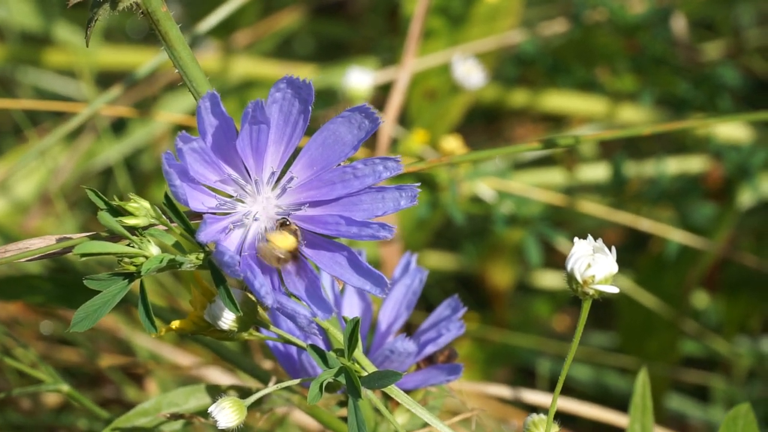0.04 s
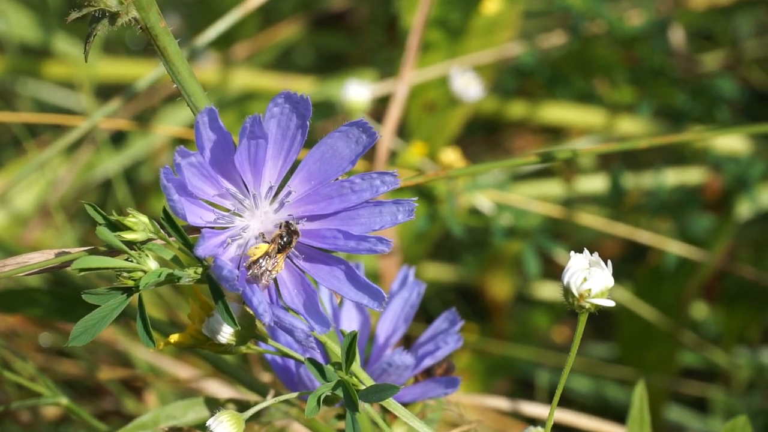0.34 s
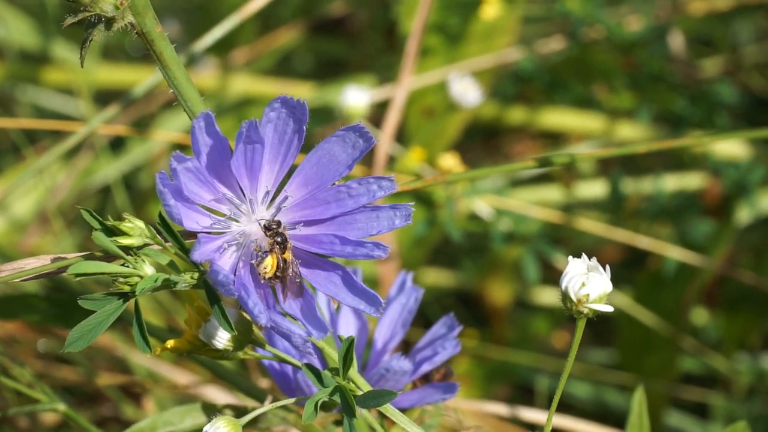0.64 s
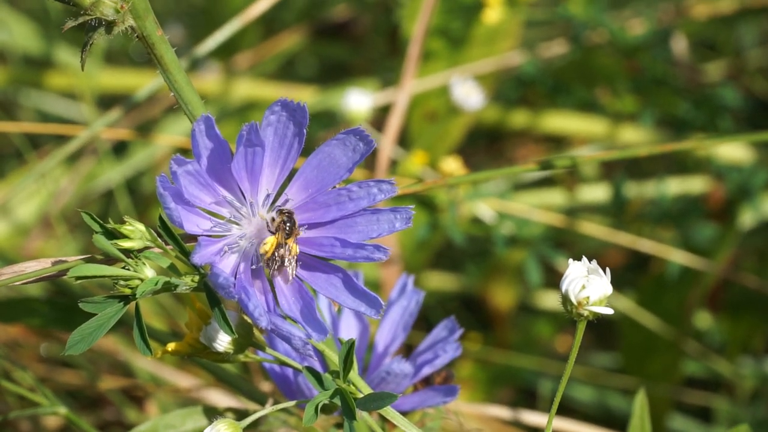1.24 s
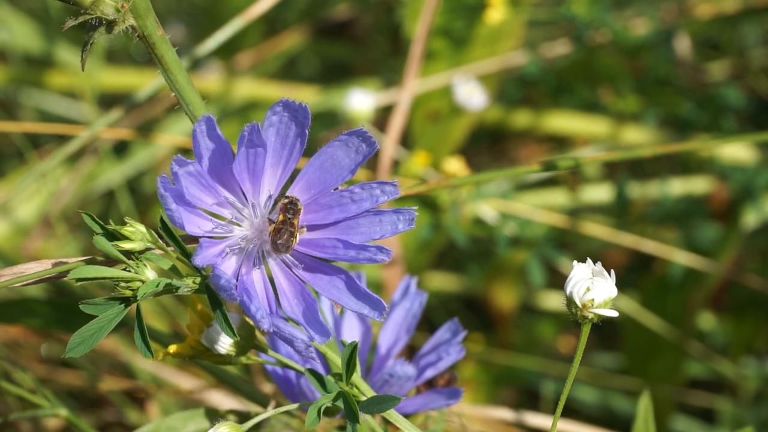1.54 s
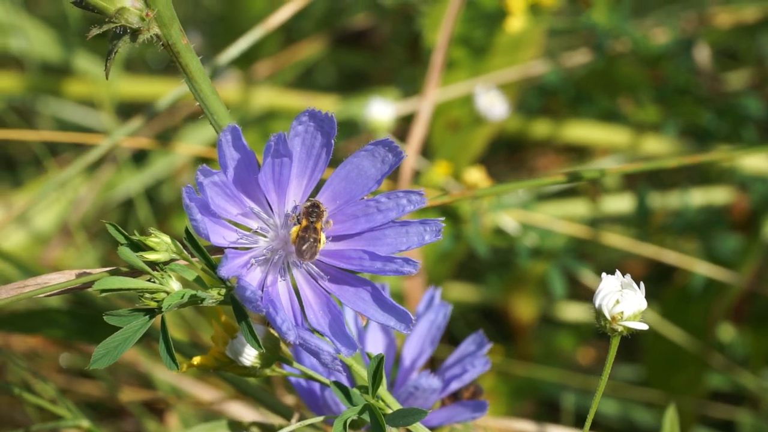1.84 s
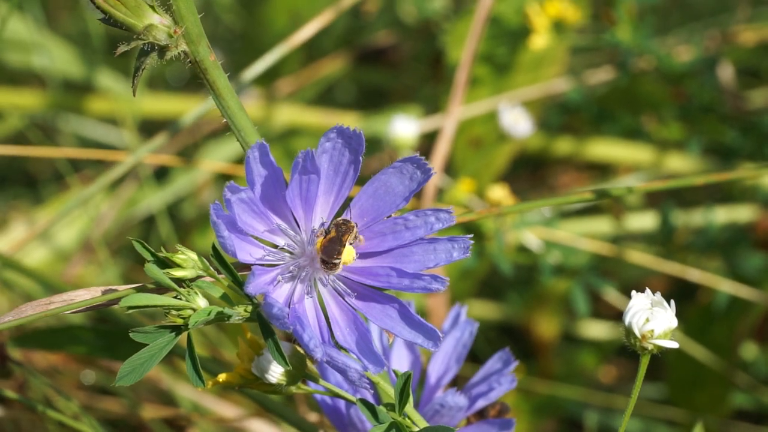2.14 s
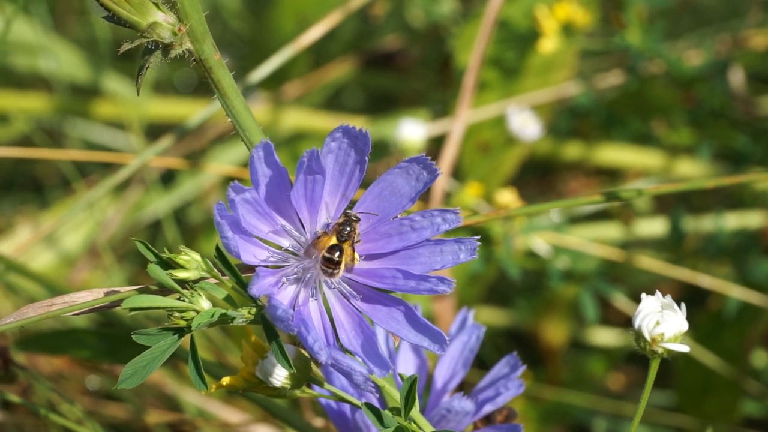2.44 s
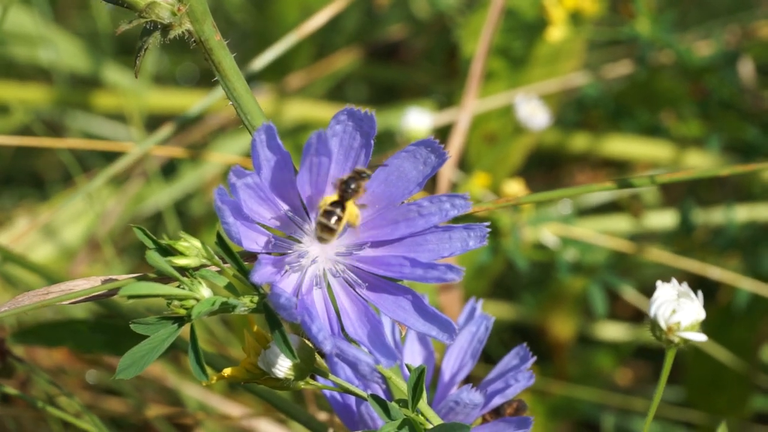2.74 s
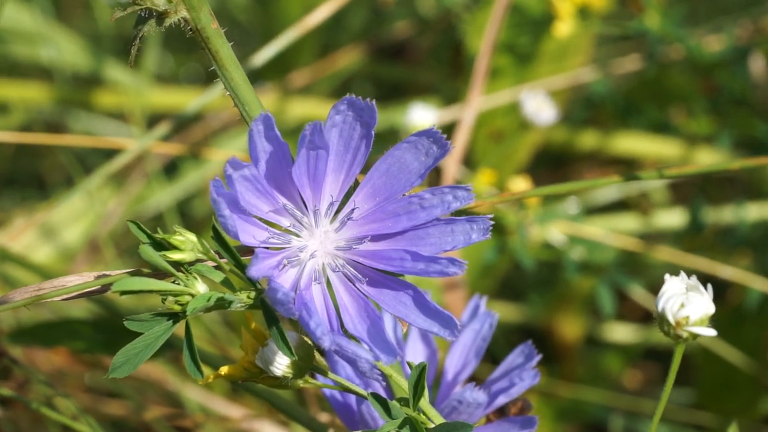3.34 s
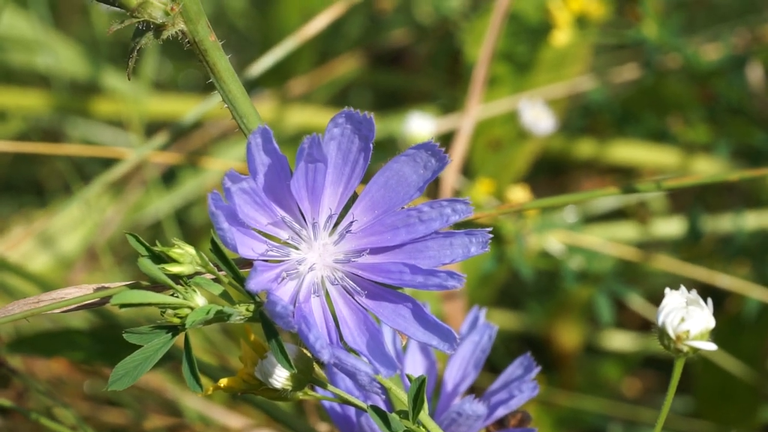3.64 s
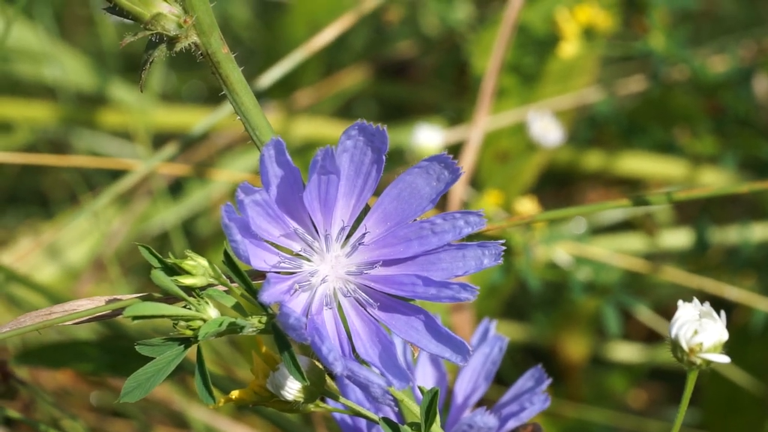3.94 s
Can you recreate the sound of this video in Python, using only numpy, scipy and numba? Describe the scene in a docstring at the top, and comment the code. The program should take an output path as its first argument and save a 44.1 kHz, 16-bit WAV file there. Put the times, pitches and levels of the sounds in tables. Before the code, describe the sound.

Several grasshoppers chirping shrilly in a meadow, with a small bee faintly buzzing past.

```python
"""A sunny meadow: three grasshoppers sing in trains of rasping strokes, others in short chirps and
scratches, over a distant chorus. They sing by stridulation: a toothed file drawn over a vein drives
the wing's resonance, which rises in pitch through each stroke, and its octave. Near the end a small
bee flies past, buzzing at the harmonics of its wing beat. Stems tick, grass rustles and faint wind
rumbles underneath."""
import sys
import numpy as np
from scipy import signal
from scipy.fft import rfft, irfft
from scipy.io import wavfile
from scipy.ndimage import uniform_filter1d
from numba import njit

SR = 44100
rng = np.random.default_rng(int(sys.argv[2]) if len(sys.argv) > 2 else 0)


def int16_out(signal):
    """Quantize to a 16-bit WAV file."""
    q = np.round(np.clip(np.atleast_2d(signal).T, -1, 1) * 32767)
    wavfile.write(sys.argv[1], SR, q.astype(np.int16))


N = 176400

# Pace. Each row: time in seconds, strokes made so far. The slow singer has one table per verse.
FAST_PACE, FAR_PACE, SLOW_VERSES = [(.583, 0), (.690, 3), (.871, 8), (1.253, 18), (1.646, 28), (2.059, 38),
                                    (2.484, 48), (2.712, 53)], [(.008, 0), (.49, 9), (3.295, 60), (3.742, 68),
                                                       (3.967, 72)], [
    [(.670, 0), (.966, 6), (1.341, 13), (1.718, 20), (1.943, 24), (2.305, 30)],
    [(2.708, 0), (2.857, 3), (3.333, 12), (3.994, 24)],
]
# Effort. Each row: time in seconds, source level in dB, mid-stroke pitch in Hz, left minus right in dB.
FAST_EFFORT, SLOW_EFFORT, FAR_EFFORT = [(.58, -30, 6250, 3), (.7, -27.5, 6450, -3), (.85, -25, 7300, -1),
                                        (1.1, -24.5, 7500, -1), (1.6, -24.5, 7600, -2),
                                        (2.2, -25, 7550, -4), (2.6, -25.5, 7150, -4),
                                        (2.72, -27.5, 7100, -3)], [(.67, -30.5, 7900, 0), (1., -27.5, 7900, 1),
                                                             (2.3, -27.5, 7900, 1), (2.7, -29, 8000, 2),
                                                             (2.92, -25.5, 8000, 2), (3.3, -27, 8050, 3),
                                                             (4, -28, 8100, 4)], [(0, -29, 7750, 0),
                                                                                  (.55, -29.5, 7750, 0),
                                                                                  (.9, -34, 7900, 0),
                                                                                  (2.3, -32, 8000, 1),
                                                                                  (3.3, -29, 8100, 1),
                                                                                  (4, -29, 8200, 2)]
# Stroke shapes. Each row: half-length in seconds, pitch rise in Hz per second, bandwidth in Hz,
# octave in dB, rasp in dB, delay of the peak in seconds. The slow singer has one row per verse.
FAST_STROKE, FAR_STROKE, SLOW_STROKES = (.022, 190000, 700, -5, -6, .005), (.022, 80000, 700, -14, -12, 0), [(.021, 60000, 900, 3, -6, .001),
                                                                                  (.023, 70000, 950, -7, -6, -.002)]
# Radiation efficiency of the wings. Each row: frequency in Hz, gain in dB.
FAST_WING, SLOW_WING = [(1500, -80), (4000, -57), (5400, -37), (6100, -21), (6700, -5), (7600, -2),
                        (8500, 1), (9500, -3), (10500, -7), (12500, -6), (13300, -4), (13800, 1.5),
                        (14400, -2), (16000, -3)], [(1500, -80), (4000, -57), (5600, -35), (6800, -10), (7700, -2),
                                           (8400, -1), (10000, -4), (11500, -2), (13000, -3), (14500, -1),
                                           (15600, 4.5)]

def singers(t):
    """Three stroke trains superpose: the fast one tires, the slow one rests once, the far one goes on."""
    fast = stroke_train(t, FAST_PACE, FAST_EFFORT, FAST_STROKE, FAST_WING)
    slow = sum(stroke_train(t, verse, SLOW_EFFORT, shape, SLOW_WING)
               for verse, shape in zip(SLOW_VERSES, SLOW_STROKES))
    far = stroke_train(t, FAR_PACE, FAR_EFFORT, FAR_STROKE, SLOW_WING)
    return fast + slow + far


def stroke_train(t, pace, effort, shape, radiation):
    """Quasi-periodic excitation: strokes recur at the given pace, each a little different in strength."""
    when, count = np.array(pace).T
    times = np.interp(np.arange(count[-1] + 1), count, when)
    db = curve(effort, times) + rng.standard_normal(len(times))
    strokes = np.c_[times, db, curve(effort, times, column=2), curve(effort, times, column=3)]
    return stridulate(t, strokes, shape, radiation)


# Spectrum of the rasp. Each row: frequency in Hz, relative gain in dB.
RASP = [(4000, -47), (5500, -21), (7000, -53), (8500, 29.5), (10500, 10), (12000, 30), (14000, 37),
        (16000, -40)]

def stridulate(t, strokes, shape, radiation):
    """Forced resonance: each stroke swells and fades as tooth clicks ring the wing at a rising pitch."""
    half_length, rise, width_hz, octave_db, rasp_db, delay = shape
    rows = np.array(strokes, float)
    nearest = np.searchsorted((rows[1:, 0] + rows[:-1, 0]) / 2 + delay, t)
    when, db, pitch, pan_db = rows[nearest].T
    from_peak = np.clip(t - when - delay, -half_length, half_length)
    hz = np.maximum(pitch + rise * np.clip(from_peak, -half_length / 2, half_length / 2), 4000)
    clicks = tooth_clicks()
    ring = lambda f, width: unit(resonate(resonate(clicks, f, width), f, 2 * width))
    octave = undb(octave_db) * ring(2 * hz, 2 * width_hz)
    rasp = undb(rasp_db) * unit(colour(clicks, RASP))
    wing = unit(ring(hz, width_hz) + octave + rasp)
    swell = np.cos(np.pi / 2 * from_peak / half_length) ** 4
    heard = through_grass(wing * swell * undb(db), pan_db, bearing=np.sign(np.mean(pan_db)))
    return colour(heard, radiation)


def tooth_clicks(teeth_per_s=2200, scatter_db=3):
    """Impulse excitation: the teeth of a file strike a wing vein, uneven in spacing and strength."""
    teeth_passed = np.cumsum(teeth_per_s * np.exp(.35 * walk(1500))) / SR
    impulses = np.diff(np.floor(teeth_passed), prepend=0)
    return unit(impulses * undb(scatter_db * rng.standard_normal(N)))


def through_grass(x, pan_db, bearing, tail_db=-1, decay_s=.0055, ear_lag_s=.000207):
    """Stems scatter a short tail; interaural level and delay give direction (bearing 1 left, -1 right)."""
    t = np.arange(N // 40) / SR
    tail = rng.standard_normal((2, len(t))) * np.exp(-t / decay_s)
    tail /= np.sqrt(np.sum(tail ** 2, axis=1, keepdims=True))
    hz = np.fft.rfftfreq(N, 1 / SR)
    right = irfft(rfft(x) * np.exp(-2j * np.pi * hz * bearing * ear_lag_s), N)
    scattered = undb(tail_db) * signal.fftconvolve(x[None], tail)[:, :N]
    return (np.array([x, right]) + scattered) * undb(np.array([pan_db, -pan_db]) / 2)


# Syllables. Each row: time in seconds, source level in dB, pitch in Hz, left minus right in dB.
CHIRPS, SCRATCHES = [(.36, -39, 6800, 1), (.58, -32.5, 6460, -5), (.622, -31, 6560, -3),
                     (.654, -34.5, 6100, -3), (1.021, -28.5, 6650, -4), (1.061, -26.5, 6500, -8),
                     (1.847, -32, 7000, 1), (1.887, -27, 6750, 1), (1.927, -26.5, 6750, 0),
                     (3.129, -33, 7360, -6), (3.172, -28, 6940, -6), (3.212, -25, 7100, -5)], [(.363, -34, 6660, 7), (.84, -28, 6800, 5), (0.883, -23, 7100, 4),
                                     (1.895, -27.5, 6900, -9), (1.943, -29.5, 6800, -13),
                                     (2.93, -33, 6700, 1), (2.966, -24.5, 7100, 2),
                                     (3.001, -22.5, 7230, 1.5), (3.035, -37, 7100, 2),
                                     (3.62, -32, 7300, -1), (3.66, -28, 7100, 3), (3.695, -24.5, 7300, 2)]
# Stroke shapes, with the same columns as the singers' shapes.
CHIRP_STROKE, SCRATCH_STROKE = (.042, 35000, 1900, -12, -3, .003), (.027, 30000, 2000, 9, 6, .001)
# Radiation efficiency of the wings. Each row: frequency in Hz, gain in dB.
CHIRP_WING, SCRATCH_WING = [(1500, -70), (3500, -46), (4700, -24), (5600, -17), (6500, -6), (7500, -1),
                            (12000, -1), (16000, -3)], [(4000, -60), (6000, -28), (8000, -10), (11500, -7),
                                               (13000, 0), (16000, 2)]

def short_calls(t):
    """Heavily damped resonance: lower chirps, and close scratches bright with octave and rasp."""
    chirps = stridulate(t, CHIRPS, CHIRP_STROKE, CHIRP_WING)
    return chirps + stridulate(t, SCRATCHES, SCRATCH_STROKE, SCRATCH_WING)


# Spectrum of the chorus. Each row: frequency in Hz, relative gain in dB.
CHORUS = [(4000, -46), (5000, -35), (6000, -21.5), (6700, -7), (7300, -1), (7700, 1), (8500, -3.5),
          (9300, -3), (10500, -2.5), (12000, -3), (13300, 1), (14300, 3.7), (15700, 3.5)]

def chorus(count=6, level_db=-25, throb_db=3.4):
    """Incoherent summation: far singers, each sweeping upward at its own rate, blur into a sizzle."""
    out = 0
    for k in range(count):
        strokes_per_s = (17 + 1.3 * k) * (1 + .0501 * walk(3.04))
        cycle = (rng.random() + np.cumsum(strokes_per_s) / SR) % 1
        clicks = tooth_clicks()
        wing = unit(resonate(clicks, 7000 + 2000 * cycle, width_hz=1040))
        voice = (clicks + undb(-4.5) * wing) * undb(-throb_db * np.cos(2 * np.pi * cycle))
        bearing = np.cos(np.pi * k / (count - 1))
        out += through_grass(voice, np.full(N, 2 * bearing), bearing)
    return unit(colour(out, CHORUS)) * undb(level_db + .4 * walk(3))


# Wing beat. Each row: time in seconds, beats per second.
BEE_PITCH = [(2.7, 150), (2.78, 128), (2.84, 140), (2.94, 123), (3.04, 142), (3.13, 138), (3.23, 104),
             (3.32, 144), (3.43, 129), (3.5, 142), (3.57, 136), (3.63, 122), (3.7, 107), (3.78, 144),
             (3.92, 108), (4, 140)]
# Fly-past. Each row: time in seconds, level in dB.
BEE_LEVEL = [(2.6, -75), (3.05, -70), (3.22, -65), (3.32, -57.5), (3.39, -56), (3.48, -49.5), (3.54, -47.5),
             (3.61, -47.5), (3.7, -61), (3.8, -63.5), (4, -72)]
# Buzz. Each row: harmonic number, relative level in dB when far, the same when closest.
BEE_HARMONICS = [(1, -12, 3), (2, 0, 0), (3, -19, -6), (4, -24, -22), (5, -15, -15), (6, -17, -15),
                 (7, -25, -27)]

def bee(t, closest_s=3.53, pass_s=.06, swish_db=-3):
    """Periodic wing beats radiate a harmonic series and a swish; low odd harmonics grow up close."""
    phase = 2 * np.pi * np.cumsum(curve(BEE_PITCH, t) * (1 + .017 * walk(110))) / SR
    fade_in = np.clip((t - BEE_LEVEL[0][0]) * 10, 0, 1)
    closeness = np.exp(-((t - closest_s) / pass_s) ** 2)
    ear_phase = np.array([[0], [.8]])
    buzz = 0
    for k, far_db, near_db in BEE_HARMONICS:
        db = far_db + (near_db - far_db) * closeness + 2.5 * walk(45)
        buzz += undb(db) * np.sin(k * phase + ear_phase + 2 * np.pi * rng.random())
    swish_spectrum = [(100, 6.5), (700, 9), (1300, -5), (3300, 0), (7000, -13)]
    swish = unit(colour(rng.standard_normal((2, N)), swish_spectrum)) * (1 + np.cos(phase)) / 2
    return undb(curve(BEE_LEVEL, t)) * fade_in * (np.sqrt(2) * buzz + undb(swish_db) * swish)


# Ticks. Each row: start in seconds, level in dB, centre frequency in Hz.
TICKS = [(1.71, -49, 2910), (2.06, -53, 1260)]

def stem_ticks(t, decay_s=.0035):
    """Damped transients: each dry tick in the stems is a broad noise band decaying exponentially."""
    out = np.zeros((2, N))
    for start, db, hz in TICKS:
        ring = lambda x: resonate(x, np.full(N, float(hz)), 1.5 * hz)
        body = np.array([unit(ring(ring(noise))) for noise in rng.standard_normal((2, N))])
        out += body * undb(db) * (t >= start) * np.exp(-np.abs(t - start) / decay_s)
    return out


# Rustles. Each row: time of the peak in seconds, half-width in seconds, level in dB, frequency in Hz.
RUSTLES = [(2.25, .17, -65, 370), (2.55, .09, -64, 3100), (2.54, .06, -67, 850), (3.58, .09, -70, 3200)]

def grass_rustles(t):
    """Friction noise: brushing grass gives soft swells, each in one band."""
    out = np.zeros((2, N))
    for when, half_width, db, hz in RUSTLES:
        centre = np.full(N, float(hz))
        band = np.array([unit(resonate(noise, centre, .5 * hz)) for noise in rng.standard_normal((2, N))])
        out += band * undb(db) * np.exp(-((t - when) / half_width) ** 2)
    return out


# Spectra of the wind and of its side signal. Each row: frequency in Hz, relative gain in dB.
WIND, WIND_SIDE = [(20, -9), (45, 3), (70, 4.5), (110, 2), (170, -6), (300, -13.5), (700, -16.5),
                   (1200, -20.5), (2500, -23.5), (4500, -22), (8000, -28)], [(20, -33), (60, -42), (125, -12.5), (300, -2), (700, 2.5), (1500, 4),
                                (8000, 0.5)]

def wind(level_db=-57.5):
    """Interaural coherence: the faint rumble is alike in both ears in the bass and diffuse above."""
    mid, side = rng.standard_normal((2, N))
    ears = mid + colour(side, WIND_SIDE) * np.array([[1], [-1]])
    return unit(colour(ears, WIND)) * undb(level_db + .6 * walk(4))


@njit
def resonate(x, hz, width_hz):
    """Second-order resonance: a band-pass whose centre may move every sample."""
    y, band_state, low_state = np.empty(len(x)), 0., 0.
    for i in range(len(x)):
        g = np.tan(np.pi * min(hz[i], .45 * SR) / SR)
        damping = width_hz / hz[i]
        band = (band_state + g * (x[i] + 1e-18 - low_state)) / (1 + g * (g + damping))
        band_state = 2 * band - band_state
        low_state += 2 * g * band
        y[i] = damping * band
    return y


def colour(x, points):
    """Zero-phase filtering by (Hz, dB) points, joined along log frequency."""
    hz, db = np.array(points, float).T
    f = np.maximum(np.fft.rfftfreq(N, 1 / SR), 1)
    return irfft(rfft(x) * undb(np.interp(np.log(f), np.log(hz), db)), N)


def walk(rate):
    """Smoothed random fluctuation of rms 1, with `rate` new values a second."""
    hold = int(SR / rate)
    steps = np.repeat(rng.standard_normal(N // hold + 1), hold)
    return unit(uniform_filter1d(steps, hold)[:N])


def curve(table, t, column=1):
    """Linear interpolation of one column over time."""
    rows = np.array(table, float)
    return np.interp(t, rows[:, 0], rows[:, column])


def undb(db):
    """Decibels to amplitude ratio."""
    return 10 ** (np.asarray(db) / 20)


def unit(x):
    """Normalisation to rms 1."""
    return x / np.sqrt(np.mean(x ** 2) + 1e-20)


def scene():
    """Linear superposition: the pressures of all the meadow's sources add at each ear."""
    t = np.arange(N) / SR
    return singers(t) + short_calls(t) + chorus() + bee(t) + stem_ticks(t) + grass_rustles(t) + wind()


def record(dry, top_hz=15760):
    """Band limiting: an elliptic low-pass cuts the top steeply."""
    return signal.sosfilt(signal.ellip(12, .1, 80, top_hz, fs=SR, output="sos"), dry)


dry = scene()
out = record(dry)
int16_out(out)
```